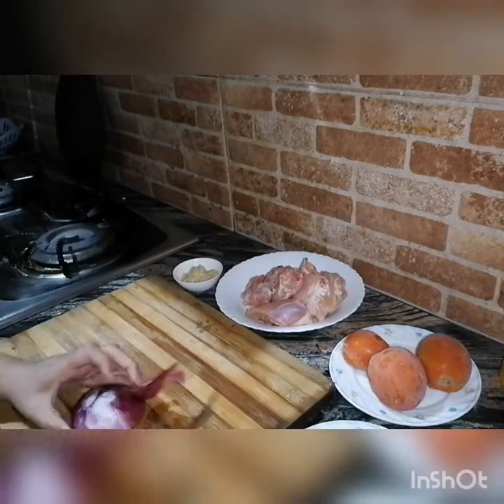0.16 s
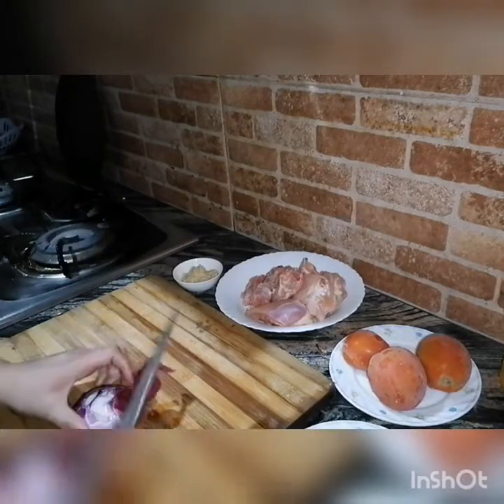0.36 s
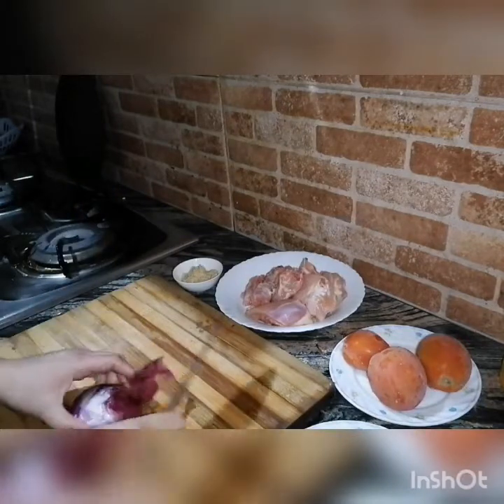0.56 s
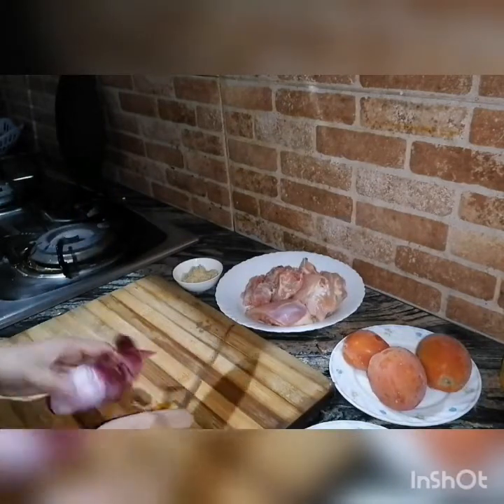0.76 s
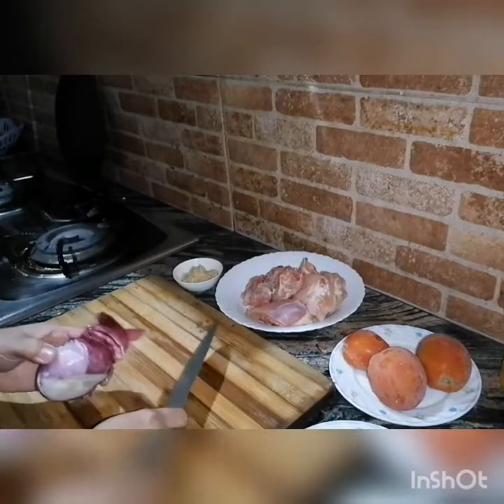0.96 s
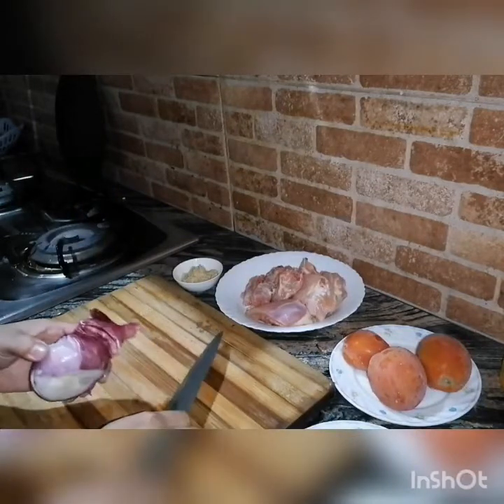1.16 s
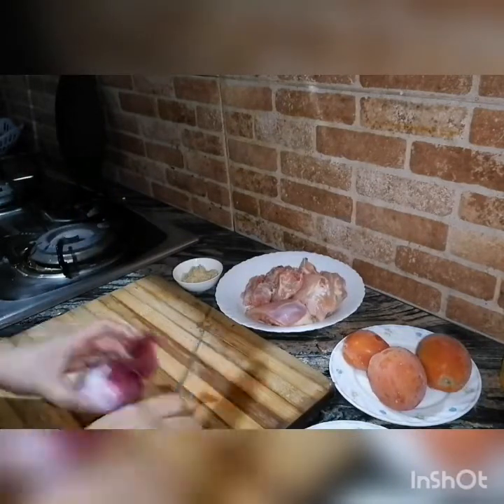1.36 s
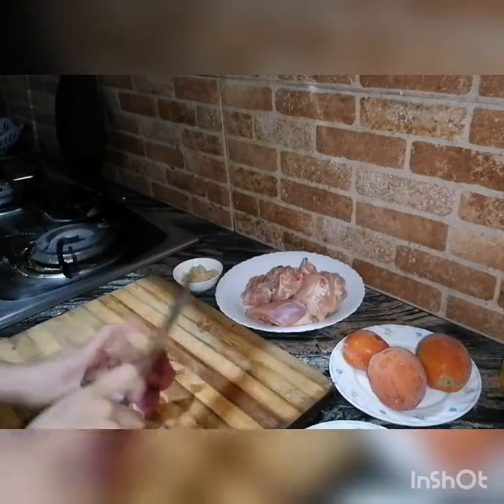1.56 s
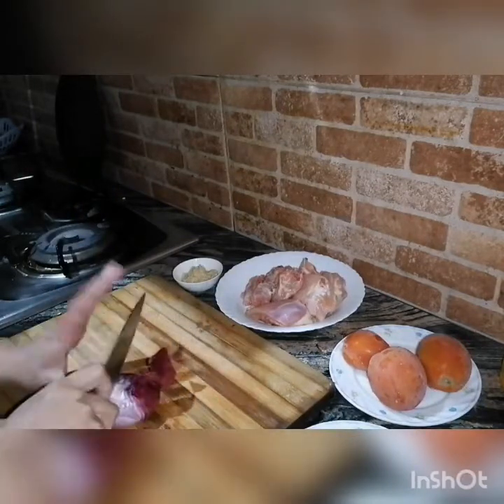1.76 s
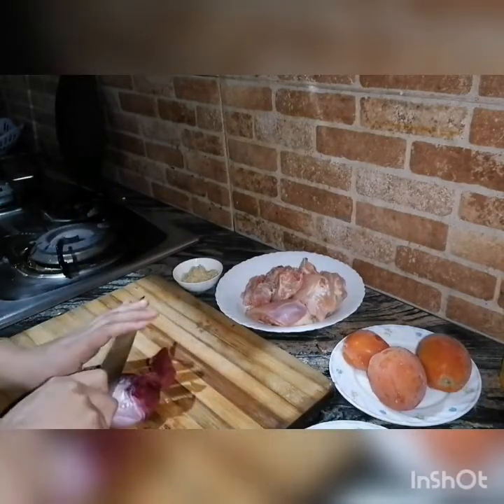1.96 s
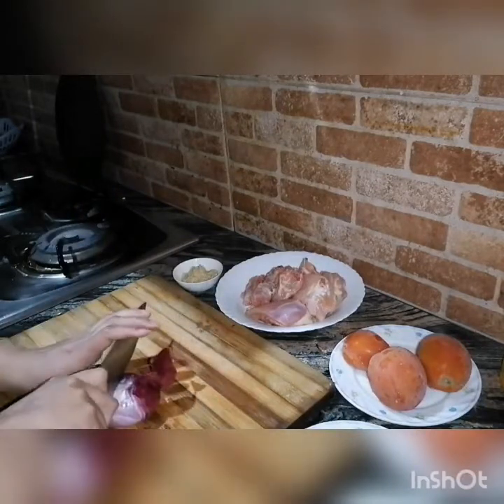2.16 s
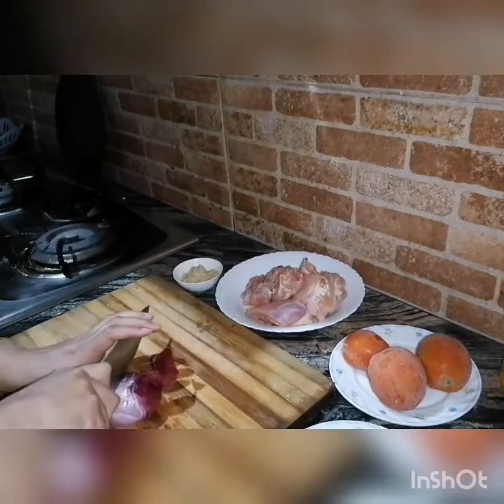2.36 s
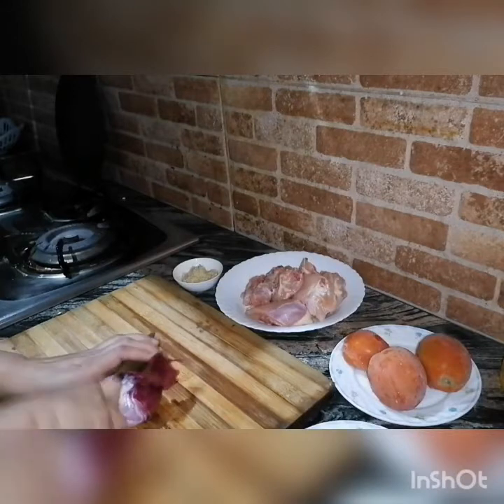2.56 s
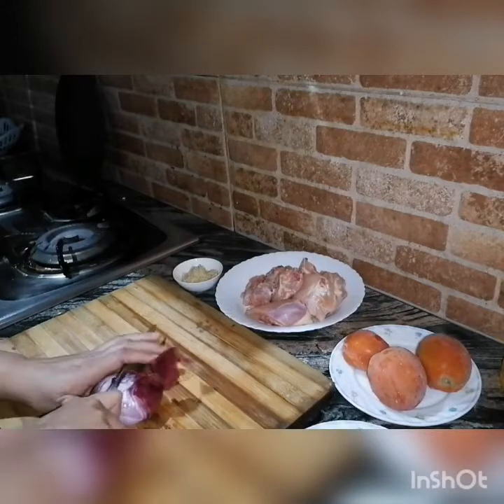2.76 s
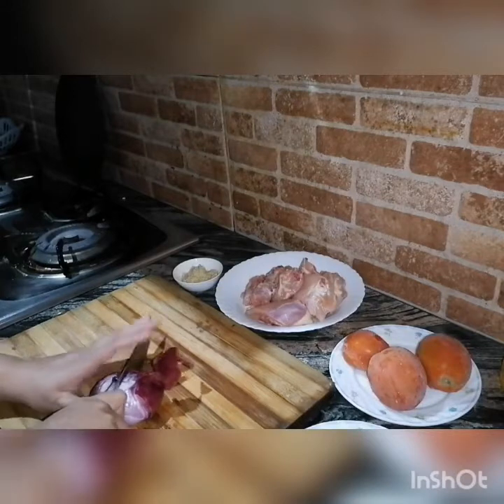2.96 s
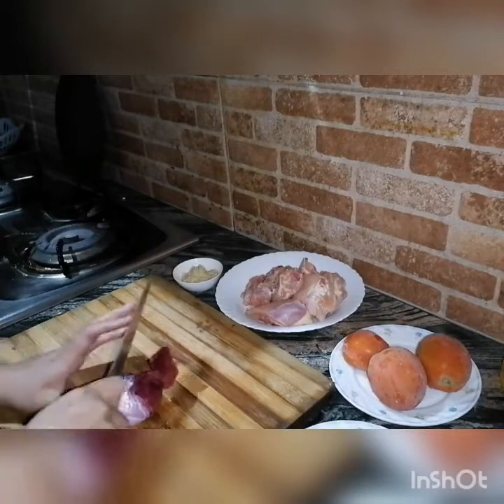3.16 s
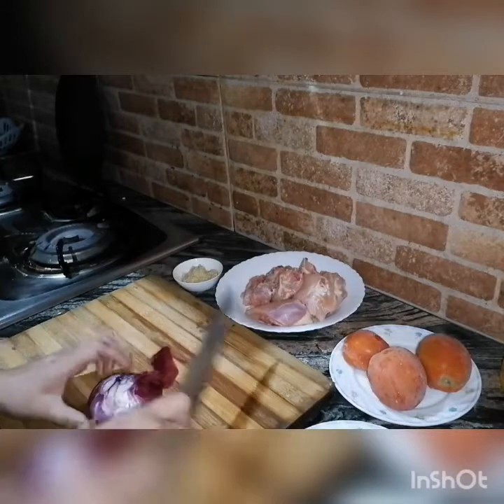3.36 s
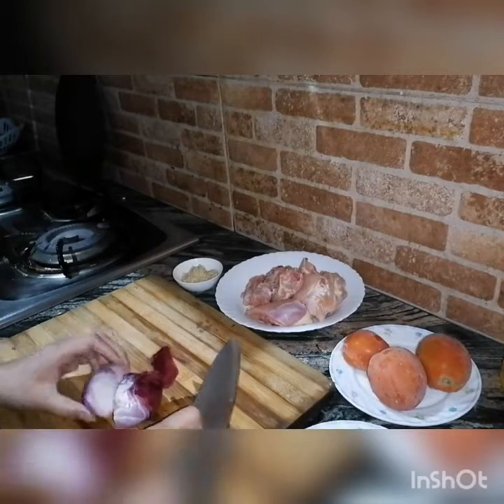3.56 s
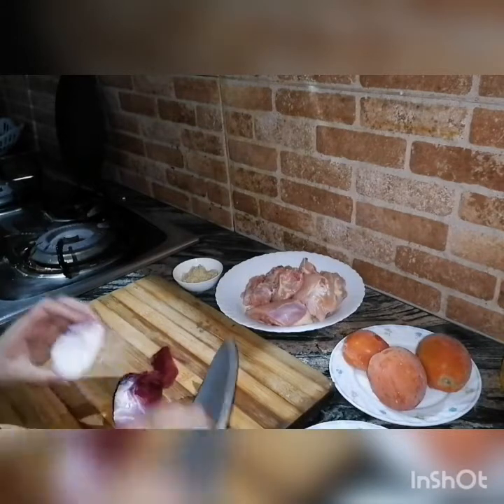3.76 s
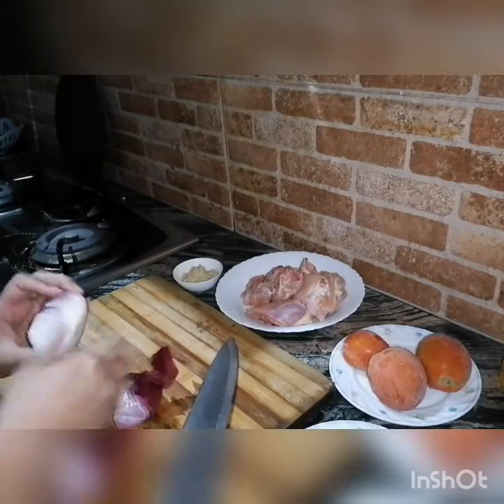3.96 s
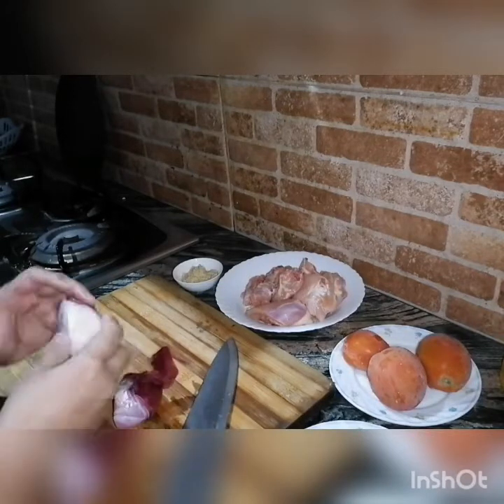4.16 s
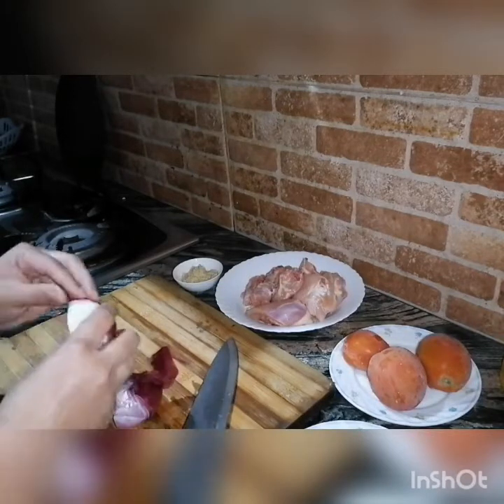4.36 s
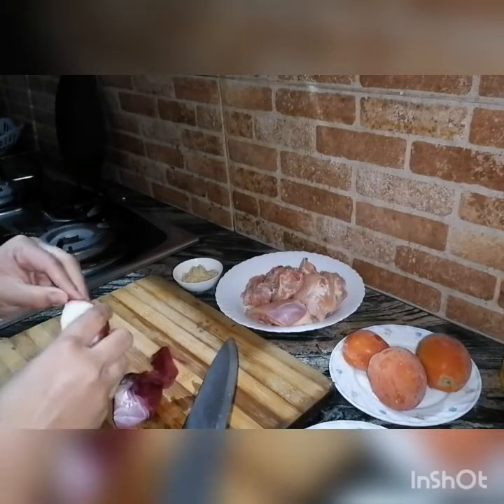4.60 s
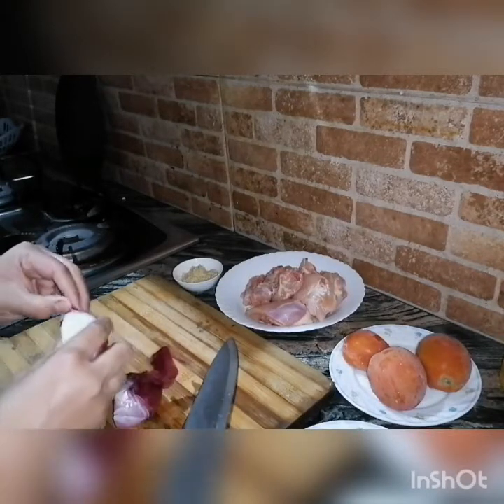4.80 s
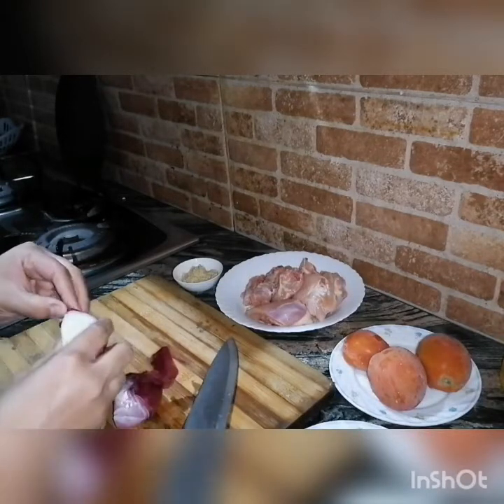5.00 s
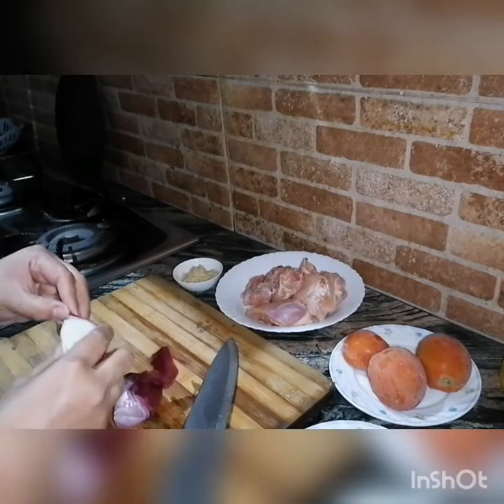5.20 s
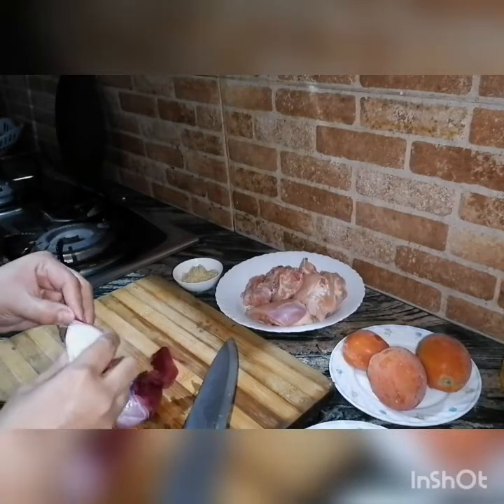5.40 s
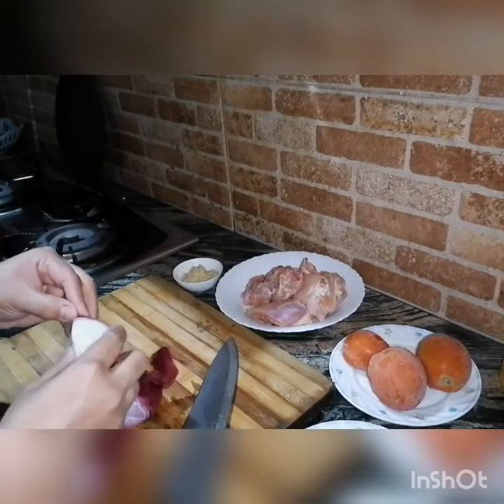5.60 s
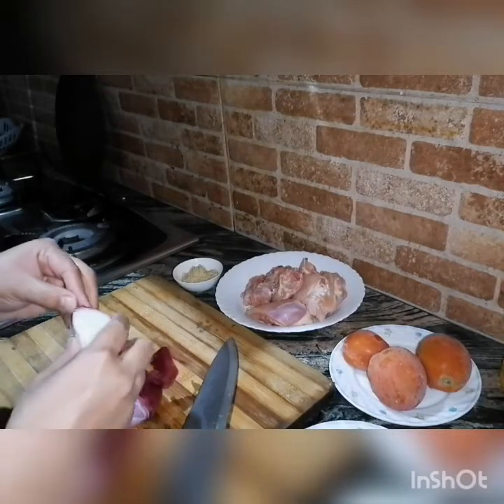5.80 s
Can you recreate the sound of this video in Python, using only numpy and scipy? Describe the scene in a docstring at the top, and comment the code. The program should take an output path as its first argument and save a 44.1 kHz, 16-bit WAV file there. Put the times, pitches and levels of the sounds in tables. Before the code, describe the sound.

Papery rustling and soft thuds on a wooden board, one loud knife chop, a knife set down with a clack, then faint peeling ticks.

```python
"""Cutting an onion in a hard-walled kitchen

Dry skin rustles and snaps as hands peel an onion: dense random cracks shaped into strokes, and single sharp breaks.
The onion lands and rolls on a wooden board, a knife crunches through and rocks: pushes and jolts ring the wood,
and touched steel sings as fading sines. Echoes and a diffuse noise tail make the room.
Two motors hum and beat faintly as summed sines, over coloured noise for room air and a far rumble."""
import sys
import numpy as np
from scipy import signal
from scipy.fft import rfft, irfft, next_fast_len
from scipy.io import wavfile
from scipy.ndimage import map_coordinates

SR = 44100
rng = np.random.default_rng(int(sys.argv[2]) if len(sys.argv) > 2 else 0)


def invert_db(level):
    """Linear amplitude ratio for a level in decibels (20 dB per decade), elementwise."""
    return 10 ** (np.asarray(level, dtype=float) / 20)


def file_out(sig):
    """Save sig as 16-bit WAV at sys.argv[1]."""
    # one column per channel
    cols = np.atleast_2d(sig).T
    # limit, then scale
    lim = np.clip(cols, -1, 1)
    pcm = np.round(lim * 32767).astype(np.int16)
    wavfile.write(sys.argv[1], SR, pcm)


N = 257544

# motors: shaft f/Hz, list of (shaft order, left level/dB, right level/dB)
MOTORS = [(48.85, [(1, -75.5, -66), (2, -77.5, -78.5), (3, -73, -66), (5, -79, -88.5), (7, -77.5, -88),
          (9, -88.5, -80), (10, -60, -89), (11, -83.5, -86)]), (49.55, [(2, -79, -96.5), (4, -80.5, -86.5),
          (10, -72, -66.5)])]
# room air and microphone hiss: f/Hz, relative density level/dB
AIR_SPECTRUM = [(15, -26.5), (25, 6), (141, -10.5), (236, -4.5), (384, -6), (489, -5.5), (641, -12),
                (988, -14.5), (1700, -22.5), (2910, -22.5), (4030, -32.5), (7310, -24), (9070, -36),
                (14800, -32), (16000, -33.5)]
AIR_DB = -61
# distant low rumble over time: t/s, level/dB
RUMBLE_LEVELS = [(0.0, -68), (0.5, -59.5), (0.97, -72.5), (1.22, -56.5), (1.45, -66.5), (1.97, -60.5),
                 (2.44, -68.5), (2.8, -84.5), (3.42, -69.5), (4.08, -76), (4.26, -71.5), (5.04, -69.5),
                 (5.4, -72.5), (5.84, -68.5)]
# colour of the rumble: f/Hz, relative density level/dB
RUMBLE_SPECTRUM = [(15, -41), (30, -4.5), (60, 4.0), (130, -3.5), (260, -48.5)]
# likeness of left and right in diffuse sound: f/Hz, likeness (0 to 1)
LIKENESS = [(60, 0.78), (300, .55), (700, 0.14), (1400, 0.019)]
# gain of hum and air, which the ringing room tail also follows: t/s, left level/dB, right level/dB
LEVEL_CURVE = [(0, -3, -3), (0.901, -0.5, -0.5), (1.3, -1.5, 0), (2.0, -0.5, -2.5), (2.619, -3.5, -4.5),
               (2.75, -4.5, -4.5), (2.95, -4.5, -5.5), (3.3, -10.5, -11), (3.8, -5, -9.5), (4.1, -5, -11),
               (4.5, -5, -8.5), (5.84, -3.5, -8)]
# decay of the kitchen: f/Hz, time to fall 60 dB t/s
ROOM_DECAY = [(100, 0.17), (500, 0.49), (1000, 0.6), (3000, 0.64), (7000, 0.58), (14000, 0.16)]
# first echoes off counter, plates and brick: delay t/ms, left level/dB, right level/dB
WALL_ECHOES = [(2.1, -10.5, -11.5), (3.6, -3.5, -6), (5.2, -18, -10), (6.2, -23, -1), (8.2, -7.5, -14.5),
               (11.8, -14, -4.5), (13.4, -5, -9), (16.8, -6, -24)]

# where hands and knife work: t/s, left-right level/dB
HAND_PAN = [(0, -3), (.3, -1), (1.36, -5.5), (2.1, -7.5), (2.6, -2.5), (3.2, 0), (3.6, 4), (3.85, 3),
            (4.4, 0), (5.84, -2)]
# resonances of the board: f/Hz, width f/Hz, level/dB
BOARD_MODES = [(168, 54, -11), (395, 25, -23.5), (510.5, 6.7, -3.5), (650.4, 27, 3.5), (809, 98, -10.5),
               (1420, 140, 0)]
# onion dragged or rolling: full strength t/s, rise t/s, hold t/s, level/dB, left-right level/dB
ROLLS = [(0, .005, 0, -40, 3), (0.194, .15, .03, -61, -3), (1.176, 0.011, 0.056, -52.5, 7),
         (1.333, 0.016, 0, -46, -5), (1.356, 0.0049, 0, -40, -13.5), (2.096, 0.037, 0, -49.5, -5.5),
         (2.13, 0.027, 0.11, -58, -1), (2.264, .004, 0, -47.5, -5.5), (2.32, .05, 0.065, -56.5, -1.5),
         (3.629, .012, 0.054, -53, 14), (3.685, .02, 0.098, -62, -1), (3.82, 0.028, 0.038, -51.5, -4),
         (5.618, 0.037, 0, -66.5, 5)]
# colour of the rolling jolts before the wood: f/Hz, relative density level/dB
JOLT_SPECTRUM = [(200, -45.5), (450, -0.5), (900, -2.5), (1500, -16.5), (3000, -52.5)]
# partials of the steel: f/Hz, level/dB, time to fall 60 dB t/s
BLADE_PARTIALS = [(5330, -7, 0.052), (6560, -12, 0.049), (7800, -6.5, 0.15), (9600, -17, 0.072)]
# touches that make the blade sing: t/s, level/dB
BLADE_TOUCHES = [(1.36, -44.5), (3.598, -67), (3.663, -62.5), (3.831, -62.5)]
# single snaps of skin and ticks of the blade: t/s, level/dB, left-right level/dB
SNAPS = [(0.0532, -37, 11), (0.1321, -47, -3.0), (0.2897, -38, -7), (0.6938, -48, -1), (0.889, -40.5, -1),
         (1.1314, -46, -5), (1.3545, -38, 2), (1.8956, -43, -0.5), (1.9617, -51.5, -18), (2.0082, -53, -10),
         (2.0707, -41, -4), (2.0782, -32.5, 5), (2.0964, -35, -4.5), (2.1605, -44.5, -9), (2.26, -18.5, -1),
         (2.4828, -48, -7.5), (2.5506, -46, -4), (2.588, -12.5, 0.5), (2.6293, -17, 1), (3.5957, -58, 6.5),
         (3.8303, -10, 13), (3.9088, -28.5, -1), (3.9498, -27.5, 8), (3.9897, -34, 1), (4.0317, -41, 6),
         (4.141, -46.5, 6), (4.2373, -51, 0), (4.674, -55, -1), (4.7476, -49.5, 10), (4.8404, -56, 0),
         (5.1551, -47, 13), (5.3018, -53, 2), (5.44, -52, 8), (5.503, -43, 12)]
# a sharp break as the microphone colours it: f/Hz, relative density level/dB
SNAP_SPECTRUM = [(1180, -43.5), (2000, -17), (3260, -3.5), (4260, -14.5), (4650, -6), (6140, -6.5),
                 (6700, 0.5), (7910, -3.5), (10700, -16), (14500, -16), (15600, -20.5), (16000, -48.5)]

# rubbing and tearing: full strength t/s, rise t/s, hold t/s, dry skin level/dB, moist flesh level/dB
STROKES = [(0, .005, 0.031, -46, -54), (0.049, 0.0027, 0.015, -41.5, -62),
           (0.115, 0.05, 0.13, -48.5, -69.5), (0.394, 0.025, 0.23, -80.5, -74), (.74, 0.13, 0, -65, -74),
           (0.902, 0.036, 0.064, -61.5, -73), (1.115, 0.0033, 0.0087, -66.5, -72),
           (1.36, .035, 0.014, -55.5, -54), (1.556, 0.043, 0.083, -57.5, -76),
           (2.05, 0.245, 0.0097, -61, -73.5), (2.07, .012, 0.0028, -46.5, -63.5),
           (2.083, .004, 0.0098, -40, -48), (2.167, 0.046, .02, -48, -57.5),
           (2.201, 0.035, 0.067, -55, -59.5), (2.256, .003, 0, -42, -45.5), (2.285, .02, .12, -58.5, -62.5),
           (2.581, .09, 0.11, -53, -61), (3.041, 0.11, .24, -79.5, -92),
           (3.596, 0.0046, 0.0051, -62.5, -65.5), (3.64, .02, 0.0051, -76.5, -78),
           (3.815, 0.084, 0.13, -71, -82), (4.544, .3, 0.049, -82, -83), (4.749, 0.06, 0, -69.5, -77),
           (4.866, 0.062, 0, -78, -95), (5.155, 0.042, 0, -67, -95), (5.298, 0.11, 0, -81, -88),
           (5.49, 0.36, 0, -77, -87.5), (5.508, 0.019, 0, -63.5, -74)]
# the blade goes through and stops dead: t/s, dry skin level/dB, finest crackle level/dB, moist flesh level/dB
CUT = [(2.588, -30.5, -35.5, -33), (2.609, -34, -46, -49.5), (2.628, -33, -47, -41.5)]
# dry skin: f/Hz, relative density level/dB
SKIN_SPECTRUM = [(2060, -40), (3500, -16), (4080, -18), (5360, -5), (6280, -7), (7130, 0), (8800, -22.5),
                 (10000, -22), (13000, -27.5), (22000, -120)]
# finest crackle: f/Hz, relative density level/dB
SHEEN_SPECTRUM = [(5000, -23), (8500, -1.5), (12400, -5), (14900, 1.5), (15500, -5.5), (16000, -25)]
# moist flesh: f/Hz, relative density level/dB
FLESH_SPECTRUM = [(650, -41.5), (1100, -17.5), (1540, -5), (2150, -9), (2940, 2.5), (3200, -4),
                  (4500, -17.5), (5850, -36.5), (9900, -120)]
SKIN_REST_DB, FLESH_REST_DB = -92, -92.5  # fidgeting between strokes
SHEEN_DB, SHEEN_GROWTH = -64.5, 0.69  # finest crackle under skin at -48 dB; it grows less than the skin
RISE_DB, FALL_DB_PER_S = 20.5, 550.5  # a stroke swells from this far down, then lets go
LINGER_DB, LINGER_DB_PER_S = -24, 134  # the skin settles

# onion lands or gives way: t/s, level/dB, contact f/Hz, left-right level/dB, relative crack level/dB
THUDS = [(0.2874, -27.5, 495, 3, -24.5), (1.033, -55, 545, -1, -6.5), (1.128, -25, 684, 2.5, -20.5),
         (1.5266, -24, 462, 2.5, -37), (2.5896, -26.5, 518, 8.5, -15), (3.178, -58.5, 530, 2, -21.5)]
THUD_CYCLES = 1.02  # cycles of contact
# knife meets the board: t/s, level/dB, contact f/Hz, cycles of contact, relative crack level/dB
CHOPS = [(.052, -53, 726, 5.7, 0.5), (1.334, -53.5, 536, 2.9, 1), (1.354, -57, 640, 1.05, -1),
         (2.257, -40, 776, 1.8, -16.5), (2.6271, -13, 827, 2.11, -7), (3.597, -37, 628, 3.27, -12.5),
         (3.829, -26.5, 604, 1.28, -5)]
# loose knife rocks on the wood: t/s, level/dB, relative crack level/dB
ROCKS = [(3.638, -48, -5.5), (3.67, -52, -5), (3.689, -60, -6), (3.759, -50, -16), (3.805, -50, -12),
         (3.908, -41.5, -10), (3.953, -41.5, -5), (3.975, -37.5, -20), (3.989, -45.5, 0),
         (4.033, -46.5, 0.5), (4.084, -47.5, -22.5), (4.1414, -47.5, -3.5), (4.177, -50, -15),
         (4.236, -51, -6.5), (4.281, -52, -31)]
ROCK_HZ, ROCK_CYCLES, ROCK_PAN_DB, ROCK_WEIGHT_DB = 557, 1.55, 8.5, -19
# hard edge on wood: f/Hz, relative density level/dB
CRACK_SPECTRUM = [(590, -23.5), (1000, 7), (1230, -1.5), (1360, 0), (1730, -5), (2740, -6), (4500, -27.5),
                  (5850, -52.5), (9900, -120)]
# thump against contact pitch: deeper contacts thump more
HEAVY_HZ, HEAVY_DB, LIGHTER_DB_PER_OCTAVE, LIGHTEST_DB = 477, -2.5, 54, -34.5


def unit(x):
    """Scale to rms 1."""
    return x / np.sqrt(np.mean(x ** 2) + 1e-20)


def along(points, hz):
    """Read (Hz, value) points on a log frequency axis."""
    f, value = np.transpose(points)
    return np.interp(np.log(hz + 1), np.log(f + 1), value)


def filtered(x, response):
    """Filter x by a complex response of frequency."""
    size = next_fast_len(x.shape[-1] + 8192)
    spectrum = rfft(x, size) * response(np.fft.rfftfreq(size, 1 / SR))
    return irfft(spectrum, size)[..., :x.shape[-1]]


def coloured(x, spectrum):
    """Give noise or grains a spectrum, at rms 1."""
    return unit(filtered(x, lambda hz: invert_db(along(spectrum, hz))))


def wobble(rate):
    """A smooth random curve with rate knots a second."""
    knots = rng.standard_normal(int(N * rate / SR) + 4)
    return map_coordinates(knots, [np.arange(N) * rate / SR])


def paired(noise):
    """Two unrelated noises made alike in the bass, where the microphone ports are close together."""
    def angle(hz):
        return np.arccos(np.clip(along(LIKENESS, hz), 0, 1)) / 2

    mid = filtered(noise[..., 0, :], lambda hz: np.cos(angle(hz)))
    side = filtered(noise[..., 1, :], lambda hz: np.sin(angle(hz)))
    return np.stack([mid + side, mid - side], -2)


def motor(hz, orders):
    """Steady sine orders of one shaft, swelling a little together."""
    turns = hz * np.arange(N) / SR
    lines = np.zeros((2, N))
    for order, left, right in orders:
        lines += invert_db([[left], [right]]) * np.sin(2 * np.pi * (order * turns + rng.random()))
    return np.sqrt(2) * invert_db(0.36 * wobble(0.69)) * lines


def room_air():
    """Lumpy air and hiss: coloured stereo noise that swells slowly."""
    noise = coloured(paired(rng.standard_normal((2, N))), AIR_SPECTRUM)
    return invert_db(AIR_DB + 0.84 * wobble(2)) * noise


def far_rumble():
    """Distant rumble: low noise following a drawn level with random swells."""
    noise = coloured(paired(rng.standard_normal((2, N))), RUMBLE_SPECTRUM)
    level_db = np.interp(np.arange(N) / SR, *np.transpose(RUMBLE_LEVELS))
    return invert_db(level_db + 1.7 * wobble(8.8)) * noise


def background(level):
    """Motor hum and air under the level curve, and the far rumble outside it."""
    hum = sum(motor(hz, orders) for hz, orders in MOTORS)
    return level * (hum + room_air()) + far_rumble()


def kitchen(x):
    """Diffuse tail of tiles and brick; the hands move, so every fifth of a second excites it anew."""
    step = SR // 5
    parts = np.pad(x.mean(0), (0, -N % step)).reshape(-1, step)
    noise = paired(rng.standard_normal((len(parts), 2, SR * 2 // 3)))
    hz, t, z = signal.stft(noise, SR, nperseg=256)
    fade = invert_db(-60 * t / along(ROOM_DECAY, hz)[:, None])
    tails = signal.istft(z * fade, SR, nperseg=256)[1]
    tails = tails * (1 - np.exp(-np.arange(tails.shape[-1]) / SR / 0.0013))  # walls answer after a few ms
    tails = tails / np.sqrt(np.mean(np.sum(tails ** 2, -1)))
    out = np.zeros((2, N + 2 * SR))
    for k, wet in enumerate(signal.fftconvolve(parts[:, None], tails, axes=2)):
        out[:, k * step:k * step + wet.shape[1]] += wet
    return out[:, :N]


def echoes(x):
    """A few distinct copies arrive before the diffuse tail; rough brick scatters their treble."""
    source = filtered(x.mean(0), lambda hz: 0.54 + 0.51 / (1 + 1j * hz / 2000))
    out = np.zeros((2, N))
    for ms, left, right in WALL_ECHOES:
        out += invert_db([[left], [right]]) * np.pad(source, (round(ms * SR / 1000), 0))[:N]
    return out


def add(track, sound, s, pan_db):
    """Lay a sound on both channels at time s."""
    start = round(s * SR)
    track[:, start:start + len(sound)] += invert_db([[pan_db / 2], [-pan_db / 2]]) * sound


def bursts(count, spectrum):
    """Rows of fresh noise, 40 ms each."""
    return coloured(rng.standard_normal((count, SR // 25)), spectrum)


def click(spectrum):
    """The shortest causal (minimum-phase) pulse with this spectrum, peak 1."""
    gain = invert_db(along(spectrum, np.fft.rfftfreq(2048, 1 / SR)))
    cepstrum = irfft(np.log(gain + 1e-4))
    cepstrum[1:1024] *= 2  # fold the energy to the start
    cepstrum[1025:] = 0
    pulse = irfft(np.exp(rfft(cepstrum)))[:SR // 25]
    return pulse / np.abs(pulse).max()


def crackle(per_s, spread_db):
    """Tiny cracks of random size at random moments; each is nearer one port or the other."""
    sizes = invert_db(spread_db * np.minimum(rng.exponential(size=N), 5)) * rng.standard_normal(N)
    cracks = sizes * (rng.random(N) < per_s / SR)
    return cracks * (1 + 1.2 * rng.standard_normal((2, N)))


def swells(s, rise, hold):
    """One gain curve per stroke on a millisecond grid: rise, hold, quick fall, faint lingering."""
    t = np.arange(0, N / SR, .001) - s[:, None]
    early = np.maximum(-t, 0) / rise[:, None]
    late = np.maximum(t - hold[:, None], 0)
    release = invert_db(-FALL_DB_PER_S * late) + invert_db(LINGER_DB - LINGER_DB_PER_S * late)
    return invert_db(-RISE_DB * early) * release


def per_sample(gain):
    """From the millisecond grid to samples."""
    return np.interp(np.arange(N) / SR * 1000, np.arange(len(gain)), gain)


def hand_pan(s):
    """Left-right dB of the hands at time s."""
    return np.interp(s, *np.transpose(HAND_PAN))


def wood(hz):
    """The board's answer to a push: a direct part and resonances of alternating sign."""
    answer = .5
    for k, (centre, width, db) in enumerate(BOARD_MODES):
        damping = 1j * hz * width
        answer = answer + (-1) ** k * invert_db(db) * damping / (centre * centre - hz * hz + damping)
    return answer


def rolling():
    """The onion drags or rolls: soft small jolts into the wood."""
    jolts = coloured(crackle(700, spread_db=1.5).mean(0), JOLT_SPECTRUM)
    s, rise, hold, db, pan = np.transpose(ROLLS)
    shape = swells(s, rise, hold)
    gains = np.array([per_sample(invert_db(db + side * pan / 2) @ shape) for side in (1, -1)])
    return gains * unit(filtered(jolts, wood))


def blade():
    """The steel sings thinly when touched: fading sines with levels that vary by touch."""
    track, t = np.zeros((2, N + SR)), np.arange(SR // 3) / SR
    for s, db in BLADE_TOUCHES:
        ring = np.zeros(len(t))
        for hz, level, t60 in BLADE_PARTIALS:
            ring += invert_db(level + rng.normal(0, 2.5) - 60 * t / t60) * np.sin(2 * np.pi * hz * t)
        add(track, invert_db(db) * ring, s, 0)
    return track[:, :N]


def snaps():
    """Each snap is a sharp break followed by a few milliseconds of bright splintering."""
    track, t = np.zeros((2, N + SR)), np.arange(SR // 25) / SR
    snap = click(SNAP_SPECTRUM)
    for (s, db, pan), noise in zip(SNAPS, bursts(len(SNAPS), SNAP_SPECTRUM)):
        splinters = 0.35 * invert_db(-60 * t / 0.032) * noise
        add(track, invert_db(db - 8.0) * (snap + splinters), s, pan)
    return track[:, :N]


def rubbing():
    """Fingers and blade drag over the onion: dense cracks in clumps, coloured as skin, sheen and flesh."""
    cracks = invert_db(1.4 * wobble(66)) * crackle(8000, spread_db=-0.74)
    moist = cracks + .7 * crackle(3300, spread_db=1.0)
    skin_noise = coloured(cracks, SKIN_SPECTRUM)
    sheen_noise = coloured(cracks, SHEEN_SPECTRUM)
    flesh_noise = coloured(moist, FLESH_SPECTRUM)

    s, rise, hold, skin_db, flesh_db = np.transpose(STROKES)
    shape = swells(s, rise, hold)
    skin = per_sample(invert_db(skin_db) @ shape) + invert_db(SKIN_REST_DB)
    flesh = per_sample(invert_db(flesh_db) @ shape) + invert_db(FLESH_REST_DB)
    sheen = invert_db(SHEEN_DB) * (skin / invert_db(-48)) ** SHEEN_GROWTH

    t = np.arange(N) / SR
    cut_s, *cut_levels = np.transpose(CUT)
    cut_skin, cut_sheen, cut_flesh = [invert_db(np.interp(t, cut_s, db, -200, -200)) for db in cut_levels]
    mix = (skin + cut_skin) * skin_noise
    mix = mix + (sheen + cut_sheen) * sheen_noise
    mix = mix + (flesh + cut_flesh) * flesh_noise
    return invert_db([hand_pan(t) / 2, -hand_pan(t) / 2]) * mix


def thump_weight(hz):
    """Thump level in dB, less for higher contacts."""
    lighter = LIGHTER_DB_PER_OCTAVE * np.log2(hz / HEAVY_HZ)
    return np.clip(HEAVY_DB - lighter, LIGHTEST_DB, HEAVY_DB)


def contacts():
    """Every blow on the board as (s, dB, Hz, left-right dB, cycles, crack dB, weight dB)."""
    blows = [(s, db, hz, pan, THUD_CYCLES, crack, thump_weight(hz)) for s, db, hz, pan, crack in THUDS]
    blows += [(s, db, hz, hand_pan(s), cycles, crack, thump_weight(hz)) for s, db, hz, cycles, crack in CHOPS]
    blows += [(s, db, ROCK_HZ, ROCK_PAN_DB, ROCK_CYCLES, crack, ROCK_WEIGHT_DB) for s, db, crack in ROCKS]
    return blows


def knocks():
    """A short push rings the board's resonances; hard contacts add a crack, heavy ones a low thump."""
    track, t = np.zeros((2, N + SR)), np.arange(SR // 5) / SR
    thump = np.cos(2 * np.pi * 132 * t) * invert_db(-60 * t / 0.04) * (1 - np.exp(-t / 0.00045))
    edge = click(CRACK_SPECTRUM)
    blows = contacts()
    for (s, db, hz, pan, cycles, crack_db, weight_db), noise in zip(blows, bursts(len(blows), CRACK_SPECTRUM)):
        phase = t * hz / cycles
        push = -np.sin(2 * np.pi * hz * t) * phase * np.exp(-phase ** 2 * 1.6)
        thud = filtered(push, wood)
        body = thud / np.abs(thud).max() + invert_db(weight_db) * thump
        crack = edge + 0.14 * invert_db(-60 * t[:len(noise)] / 0.034) * noise
        add(track, invert_db(db) * body, s, pan)
        add(track, invert_db(db + crack_db + 9) * crack, s + .0006, pan)
    return track[:, :N]


def scene():
    """Near sounds and their echoes reach the left port first; the room tail follows."""
    s, *curves = np.transpose(LEVEL_CURVE)
    level = invert_db([np.interp(np.arange(N) / SR, s, db) for db in curves])
    blows, bright, steel, rub, roll = knocks(), snaps(), blade(), rubbing(), rolling()
    near = blows + bright + steel + invert_db(-2.5) * rub + invert_db(-6.0) * roll
    near = invert_db(1.0) * near + invert_db(-4.5) * echoes(near)
    near = np.array([near[0], np.pad(near[1], (6, 0))[:N]])  # right port hears it 6 samples later
    into_room = invert_db(-1.0) * blows + invert_db(-1.5) * bright + invert_db(-5.5) * steel
    into_room = into_room + invert_db(-9.5) * rub + invert_db(-11.0) * roll
    tail = level * kitchen(into_room / level)  # while ringing, a tail follows changes of the level curve
    return near + tail + background(level)


def low_pass(x):
    """Removes everything above the highest recorded frequency."""
    return signal.sosfilt(signal.butter(12, 16460, fs=SR, output="sos"), x)


def record(dry):
    """A phone's microphones lose the deepest bass: two first-order high-passes at 35 Hz."""
    mix = filtered(dry, lambda hz: (1j * hz / (35 + 1j * hz)) ** 2)
    return low_pass(mix)


dry = scene()
out = record(dry)
file_out(out)
```